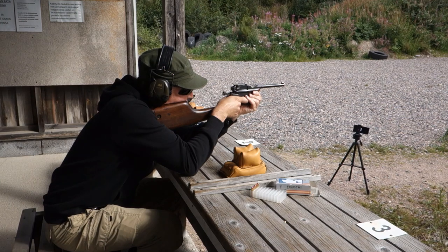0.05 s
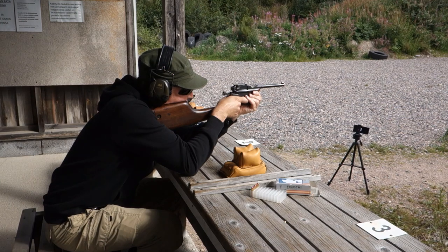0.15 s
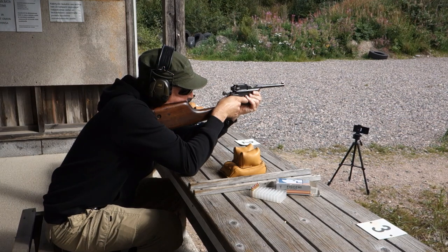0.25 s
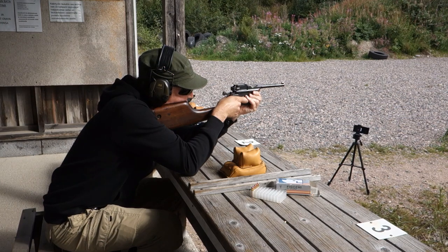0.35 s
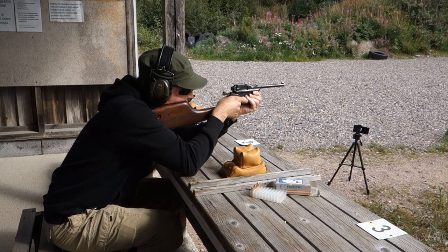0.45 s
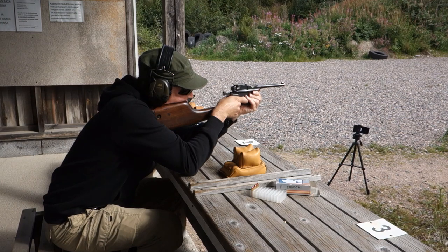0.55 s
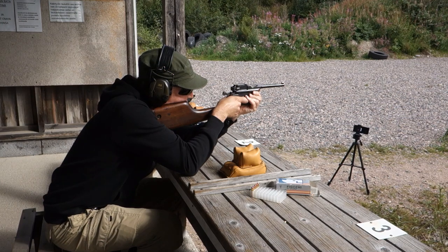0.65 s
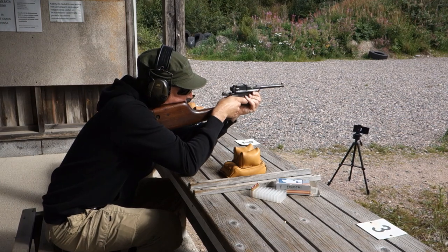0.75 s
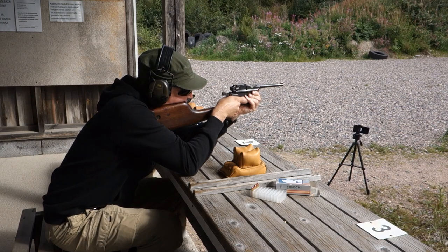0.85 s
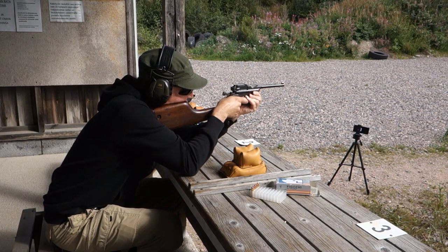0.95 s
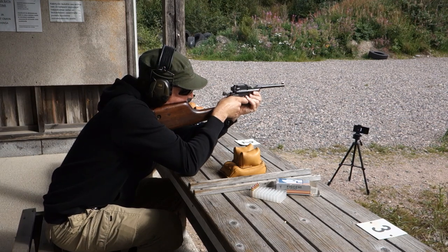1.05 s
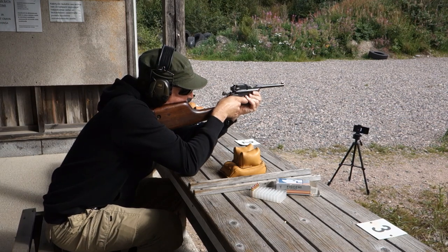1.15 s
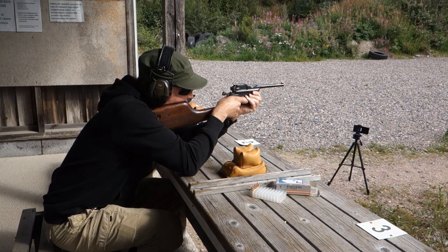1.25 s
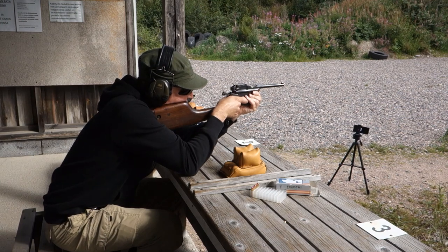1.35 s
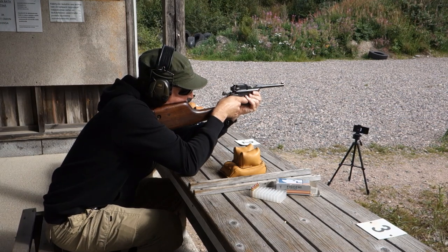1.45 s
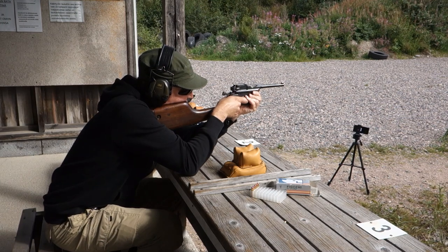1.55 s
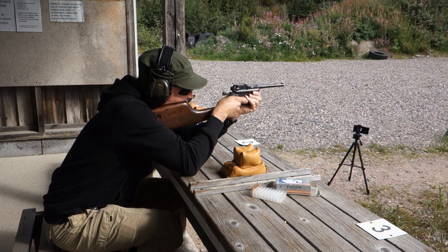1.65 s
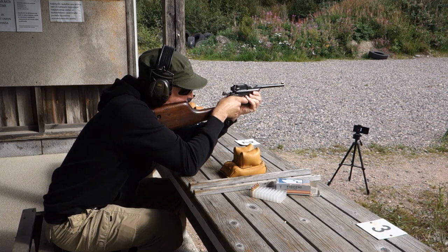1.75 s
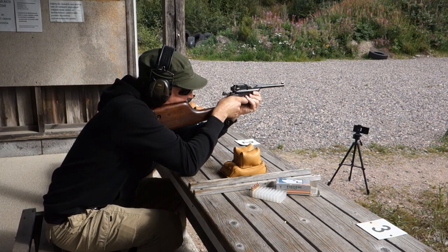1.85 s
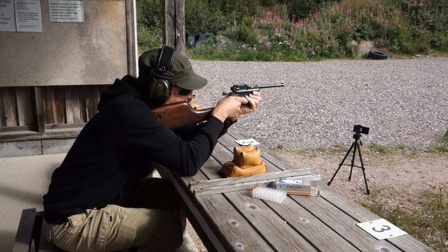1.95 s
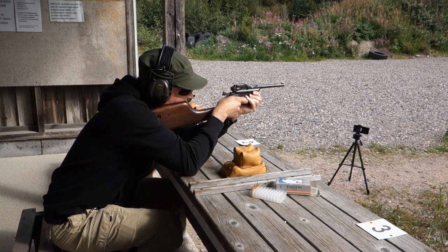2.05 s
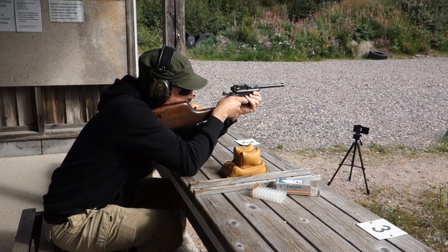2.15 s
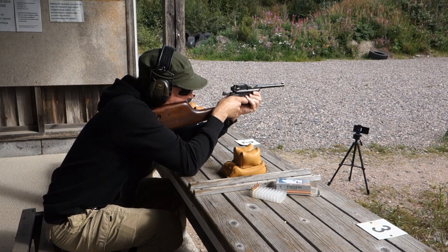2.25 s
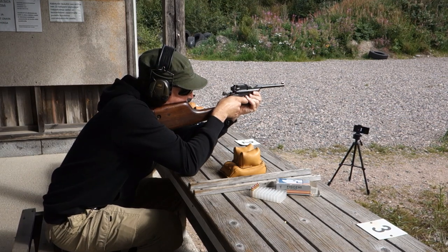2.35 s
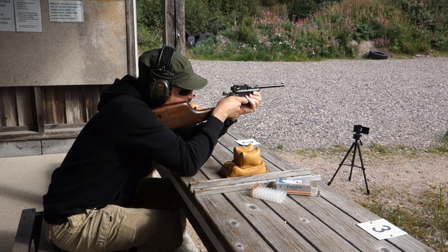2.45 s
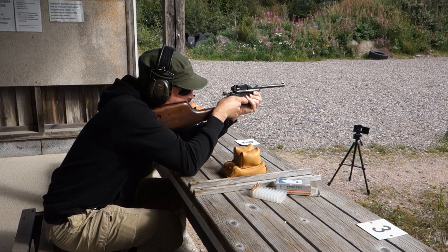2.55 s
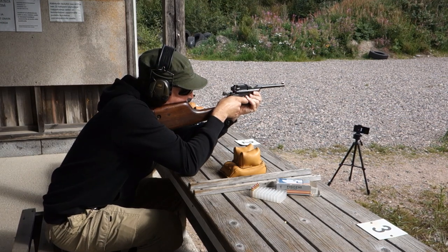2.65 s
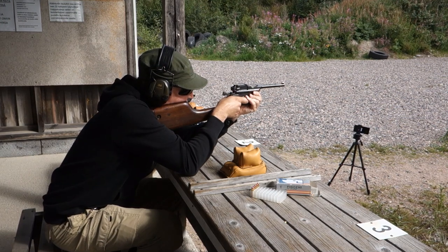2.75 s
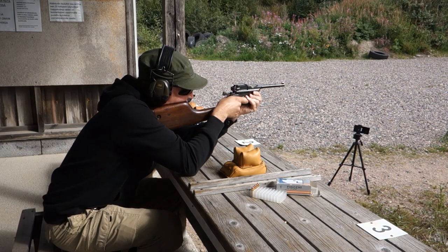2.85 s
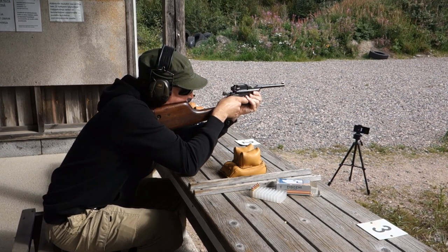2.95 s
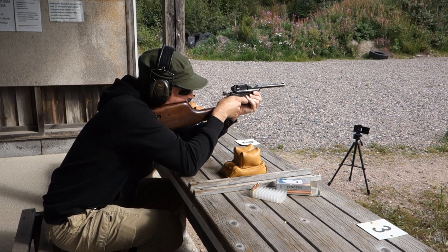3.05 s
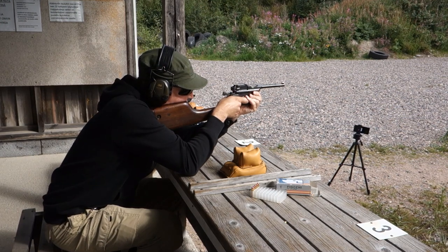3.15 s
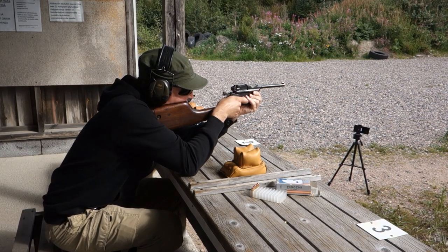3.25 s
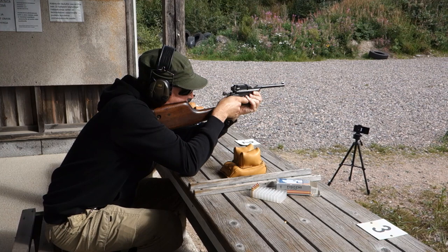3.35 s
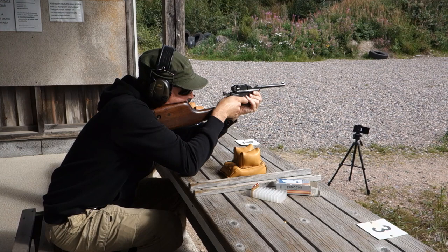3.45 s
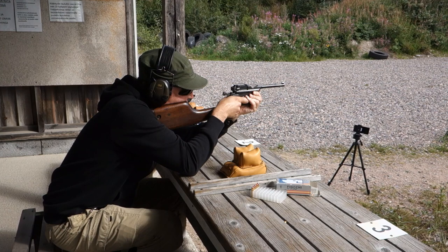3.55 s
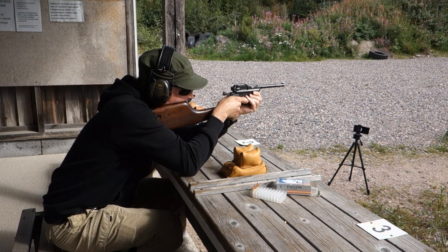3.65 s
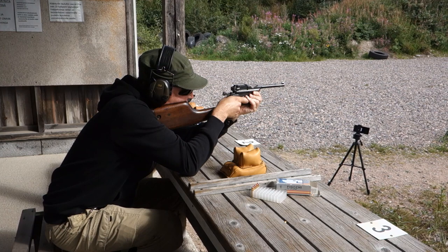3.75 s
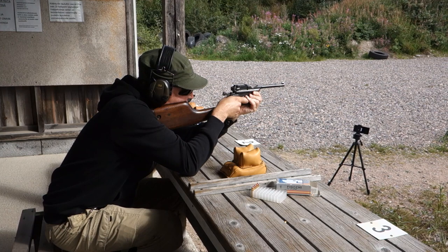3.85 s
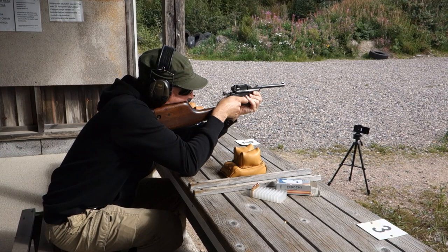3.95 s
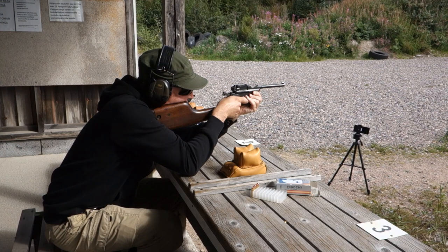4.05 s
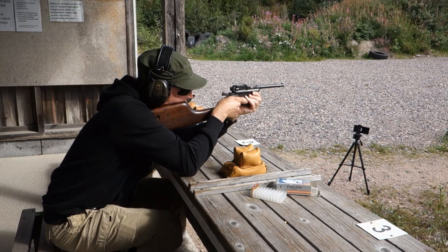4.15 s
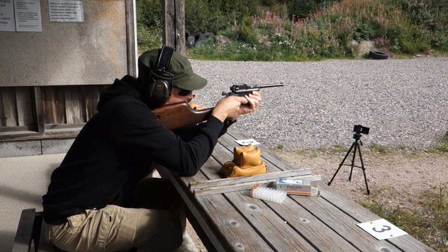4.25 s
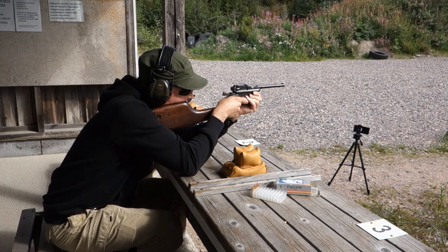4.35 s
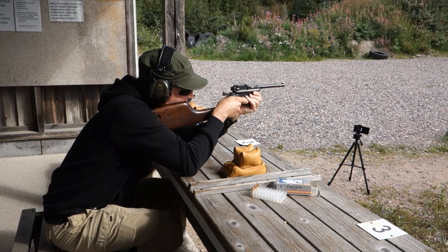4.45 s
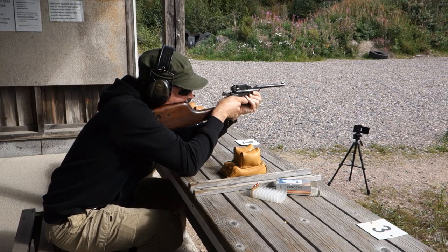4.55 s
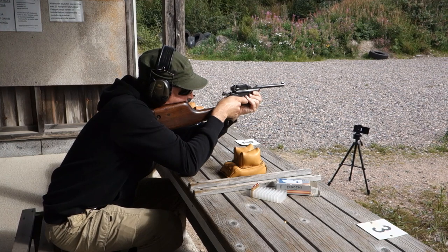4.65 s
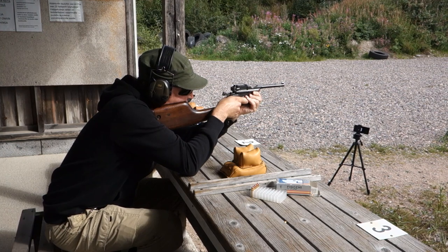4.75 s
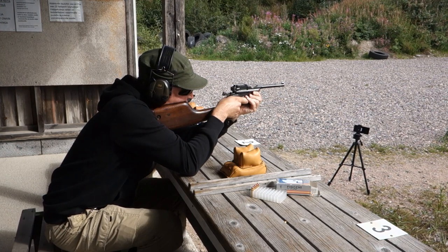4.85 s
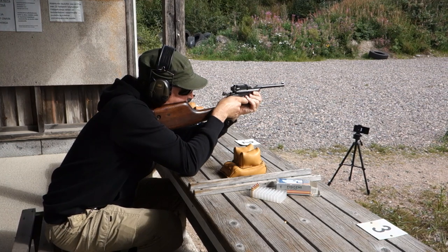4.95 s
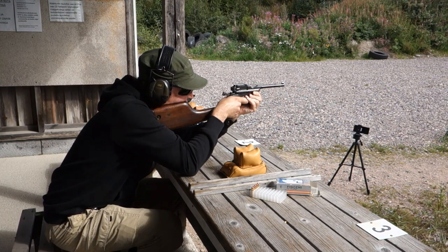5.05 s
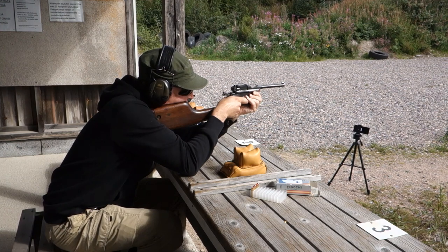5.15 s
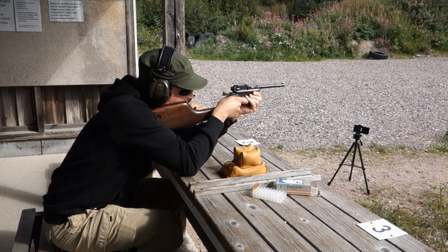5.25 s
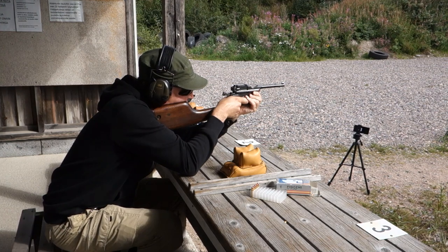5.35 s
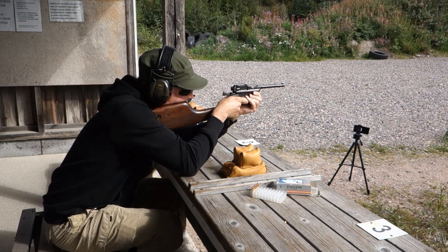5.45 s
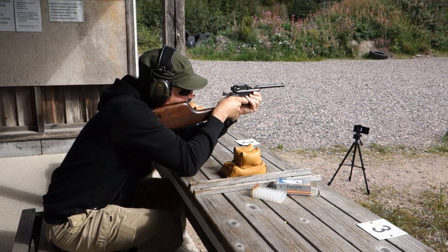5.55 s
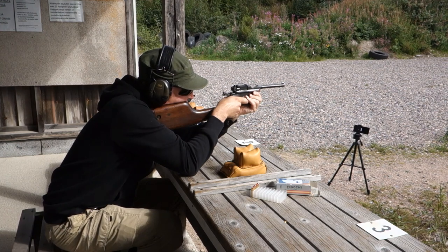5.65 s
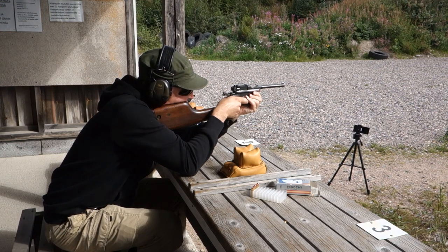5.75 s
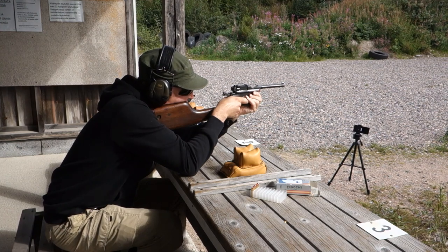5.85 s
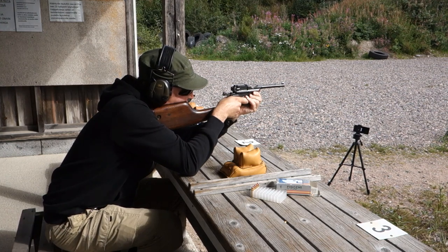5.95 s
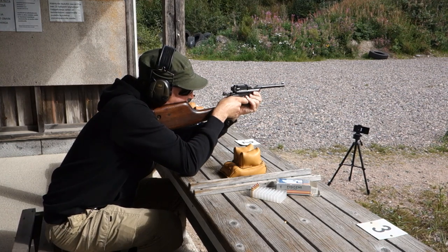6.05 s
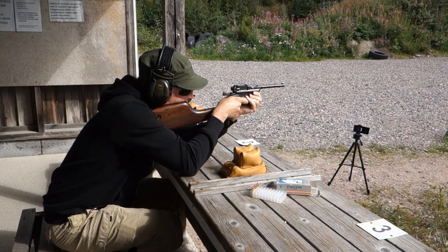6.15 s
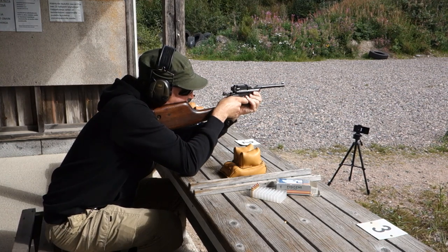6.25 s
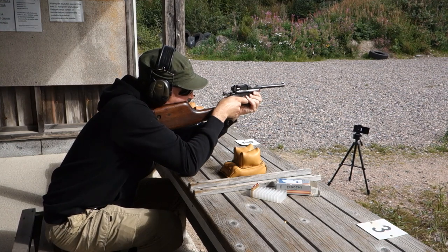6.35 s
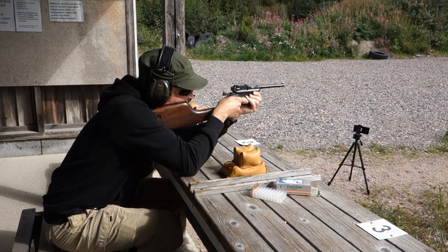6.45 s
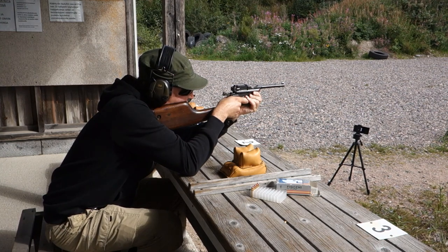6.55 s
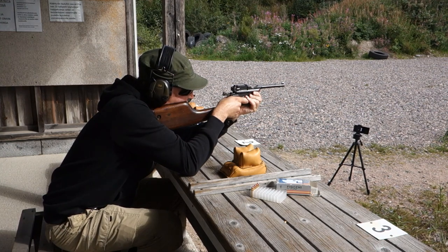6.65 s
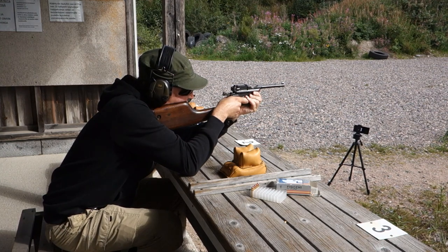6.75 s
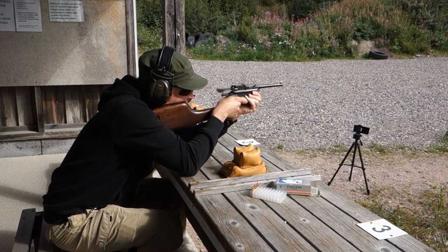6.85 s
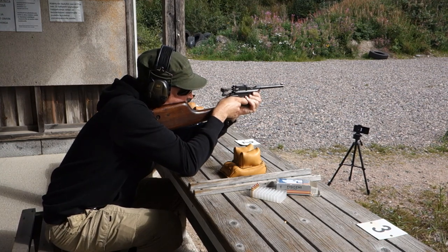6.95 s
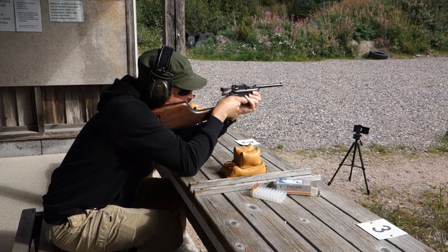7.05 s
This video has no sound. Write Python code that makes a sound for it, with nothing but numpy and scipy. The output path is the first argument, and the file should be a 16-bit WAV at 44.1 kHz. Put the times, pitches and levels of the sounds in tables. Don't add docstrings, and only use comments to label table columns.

```python
import sys
import numpy as np
from scipy import signal
from scipy.io import wavfile
from scipy.ndimage import uniform_filter1d

SR = 44100
rng = np.random.default_rng(int(sys.argv[2]) if len(sys.argv) > 2 else 0)


def waveform_to_disk(signal):
    frames = np.transpose(np.atleast_2d(signal))
    scaled = np.clip(frames, -1, 1) * 32767
    samples = np.round(scaled).astype(np.int16)
    wavfile.write(sys.argv[1], SR, samples)


def field_ratio(decibels):
    return 10 ** (np.asarray(decibels, dtype=float) / 20)


N = 312228

# t/s, blast level/dB, hammer level/dB
SHOTS = [
    (0.622, -16.5, -28.5),
    (4.0119, -15, -22.5),
    (6.7931, 5, -25),
]
# f/Hz, correlation
SHOT_LIKENESS = [(60, 1), (140, 1), (270, 0.98), (490, 1), (1410, 0.82), (4040, 0.39), (11600, -0.35)]


def in_time(rows):
    s, value = np.transpose(rows)
    return np.interp(np.arange(N) / SR, s, value)


def at_hz(points, hz):
    f, value = np.array(points).T
    return np.interp(np.log(hz), np.log(f), value)


def rms_one(x):
    return x / np.sqrt(np.mean(x ** 2) + 1e-20)


def band(x, low_hz, high_hz, order=2):
    sos = signal.butter(order, [low_hz, min(high_hz, .45 * SR)], "band", fs=SR, output="sos")
    return signal.sosfilt(sos, x)


def drift(rate):
    pole = np.exp(-2 * np.pi * rate / SR)
    wander = signal.lfilter([1], [1, -2 * pole, pole * pole], rng.standard_normal(N + SR))
    return rms_one(wander[SR:])


def lumps(rate, depth_db):
    return field_ratio(1.5 * depth_db * np.tanh(drift(rate) / 1.5))


def panned(x, pan_db):
    return np.array([x * field_ratio(pan_db / 2), x * field_ratio(-pan_db / 2)])


def ring(clicks, hz, t60):
    r = field_ratio(-60 / (t60 * SR))
    w = 2 * np.pi * hz / SR
    return signal.lfilter([0, np.sin(w)], [1, -2 * r * np.cos(w), r * r], clicks + 1e-18)


def struck(modes, size):
    blow = np.eye(1, size)[0]
    return sum(field_ratio(db) * ring(blow, hz, t60) for hz, db, t60 in modes)


def noise(size, spectrum, likeness, t60=((1, 1e6),)):
    edges = 25 * 2 ** np.arange(0, 9.1, .5)
    white = rng.standard_normal((2, 2, size))
    t = np.arange(size) / SR
    out, power = 0, 0
    for k, (low, high) in enumerate(zip(edges, edges[1:])):
        hz = np.sqrt(low * high)
        alike = np.clip(at_hz(likeness, hz), -1, 1)
        gain = field_ratio(at_hz(spectrum, hz))
        if gain > 1e-4:
            mid, side = band(white[k % 2], low, high)
            pair = np.sqrt(.5 + alike / 2) * mid + np.sqrt(.5 - alike / 2) * side * [[1], [-1]]
            out = out + gain * pair * field_ratio(-60 * t / at_hz(t60, hz))
            power += gain ** 2 * (high - low) * 2 / SR
    return out / np.sqrt(power)


def smeared(sound, t60, gap_s=1e-6):
    t = np.arange(len(sound)) / SR
    walls = rng.standard_normal((2, len(t))) + rng.standard_normal(len(t))
    walls = walls * field_ratio(-60 * t / t60) * (1 - np.exp(-(t / gap_s) ** 4))
    walls = rms_one(walls) / np.sqrt(len(t))
    return signal.fftconvolve(walls, sound[None])[:, :len(t)]


def add(track, s, sound):
    i = round(s * SR)
    track[:, i:i + sound.shape[1]] += sound[:, :N - i]


def ticks(table, modes, dull_db, grit_s, body_room_db):
    usual_peak_db, hard_is_bright = -32, 0.2
    out, click = np.zeros((2, N)), np.eye(1, SR // 3)[0]
    bright = 4.77 * band(click, 3830, 14000)
    dull = band(click, 2000, 5400)
    rung = struck(modes, len(click))
    for s, peak_db, mode_db, room_db, pan_db in table:
        grit = rng.standard_normal(400) * np.exp(-np.arange(400) / SR / grit_s)
        grit[0] += 4.5
        snap = bright + field_ratio(dull_db - hard_is_bright * (peak_db - usual_peak_db)) * dull
        snap = np.convolve(snap[:300], grit / np.linalg.norm(grit))
        snap = np.pad(snap, (0, len(click) - len(snap)))
        body = field_ratio(mode_db) * rung
        hiss = field_ratio(room_db + 17.5) * band(snap, 1500, 8100, order=1)
        room = smeared(hiss + field_ratio(body_room_db) * body, t60=0.24, gap_s=0.0035)
        add(out, s + 0.00019, field_ratio(peak_db + 0.5) * (panned(snap + body, pan_db) + room))
    return out


def air():
    # f/Hz, level/dB per Hz
    spectrum = [(120, -22.5), (200, -17.5), (344, -7), (623, -6), (1410, -13), (2220, -12), (2770, -15.5),
                (3450, -14.5), (5740, -19), (10600, -28.5), (11500, -68.5), (15000, -81), (22000, -120)]
    # f/Hz, correlation
    likeness = [(60, 0.94), (220, 1), (830, 0.39), (3100, 0.44), (11600, -0.38)]
    # t/s, level/dB
    level = [(0, -41), (.03, -79), (.07, -86), (.13, -61), (.24, -58), (.29, -51.5), (.37, -58), (.59, -59),
             (2.5, -62), (3.5, -58), (3.83, -55.5), (3.88, -54.5), (3.96, -53), (5.7, -60.5), (6.6, -56.5),
             (6.66, -51.5), (6.74, -50.5)]
    sway_db = .6 * drift(4)
    return field_ratio(in_time(level) + 2.0 + sway_db) * noise(N, spectrum, likeness)


def gusts():
    # t/s, level/dB
    breeze_level = [(0, -35.5), (1.1, -35.5), (2.1, -50), (2.8, -51), (3.4, -51), (3.75, -53.5), (3.9, -37),
                    (4.5, -52), (4.9, -56.5), (5.25, -53), (5.5, -62), (6.1, -45), (7.08, -41.5)]
    # start t/s, hold/s, rumble level/dB, edge level above it/dB
    gust_events = [(-.01, 0.073, -24.5, 7), (0.106, 0.022, -32, -13.5), (0.298, 0.012, -28, -17),
                   (0.342, 0.13, -28, -4), (0.537, 0.035, -24, -5), (1.224, 0.033, -28, -6),
                   (1.294, 0.086, -27, 1), (1.404, 0.134, -32.5, -7.5), (1.605, 0.1, -40, -32),
                   (1.742, 0.112, -30.5, -5.5), (1.879, 0.043, -29, -7.5), (2.02, 0.018, -26.5, -19),
                   (2.073, 0.24, -40.5, -37), (2.36, 0.059, -41.5, -34), (2.526, 0.0192, -36.5, -12.5),
                   (2.567, 0.084, -45, -49), (2.884, 0.078, -35, -16), (3.005, 0.12, -38, -25),
                   (3.087, 0.11, -42.5, -33), (3.228, 0.1, -50, -9), (3.421, 0.025, -39.5, -13),
                   (3.503, 0.068, -49, -12), (5.745, 0.11, -56, -18), (6.048, 0.017, -27.5, -18.5),
                   (6.084, 0.08, -37.5, -34.5), (6.227, 0.11, -28, -14.5), (6.442, 0.04, -24.5, -34),
                   (6.498, 0.11, -36.5, -45), (6.621, 0.017, -53, -19), (6.708, 0.034, -47, -3)]
    rise_s, fall_s, breeze_edge_db = 0.0089, 0.019, -21.5
    t = np.arange(N) / SR
    breeze = field_ratio(in_time(breeze_level)) * lumps(5.3, depth_db=3.0)
    rumble, edge = breeze, breeze * field_ratio(breeze_edge_db)
    for s, hold, level_db, edge_db in gust_events:
        shape = np.clip((t - s) / rise_s, 0, 1) * np.exp(-np.maximum(t - s - hold, 0) / fall_s * 2)
        rumble = rumble + field_ratio(level_db) * shape
        edge = edge + field_ratio(level_db + edge_db) * shape
    return rumble, edge


def wind():
    # f/Hz, level/dB per Hz
    rumble_spectrum = [(12, -48), (20, -10), (70, 1), (130, -1.5), (201, -5), (252, -10), (300, -14.5),
                       (400, -35.5), (520, -43.5), (880, -120)]
    # t/s, peak level/dB, f/Hz, snap level/dB
    puffs = [(0.012, -6.5, 179, -26), (0.033, -7.5, 217, 7.5), (0.05, -10, 183, -11), (0.068, -21, 245, 13),
             (.114, -22.5, 257, -15), (0.347, -18.5, 158, -14), (0.391, -15.5, 182, -24),
             (0.419, -12, 196, 5.5), (.466, -15.5, 181, -25), (0.542, -22, 151, 2), (0.555, -30, 363, 25),
             (1.245, -17, 293, -18), (1.327, -10.5, 150, -6), (1.347, -14, 226, 5.5), (1.747, -29, 151, -3),
             (1.786, -26, 232, -16), (1.83, -18.5, 216, -18), (1.849, -15.5, 177, -28),
             (1.89, -18, 118, -9), (2.032, -29, 152, -12), (6.057, -20.5, 330, -15), (6.26, -25, 301, -20),
             (6.32, -20, 160, -24), (6.44, -16, 178, -24), (6.46, -19.5, 209, -29), (6.47, -18, 191, -25),
             (6.512, -24.5, 153, -20), (6.649, -31, 150, -2),
             (0.435, -21, 177, -17), (1.229, -22, 142, -15), (1.314, -25, 197, -15),
               (1.383, -22, 167, -15), (1.399, -16.5, 139, -15), (1.432, -19, 262, -15),
               (1.47, -23, 221, -18), (1.496, -19, 117, -17), (1.52, -26, 219, -15), (1.547, -31, 212, -15),
               (1.705, -27.5, 169, -13), (1.916, -31, 160, -15), (2.177, -27.5, 163, -15),
               (2.198, -37, 194, -15), (2.262, -46, 138, -15), (2.312, -36, 140, -15),
               (2.37, -36, 123, -13), (2.406, -22.5, 124, -13), (2.542, -42, 192, -15),
               (2.594, -32, 129, -15), (2.623, -42, 164, -15), (2.647, -35, 220, -15),
               (2.807, -34.5, 130, -15), (2.898, -37, 122, -15), (2.921, -36, 187, -15),
               (2.937, -32, 261, -15), (2.955, -41, 165, -15), (3.027, -37, 144, -15),
               (3.057, -26, 132, -15), (3.074, -32, 146, -13), (3.088, -30, 146, -17),
               (3.111, -22.5, 154, -23), (3.323, -37, 174, -15), (3.434, -37, 123, -9),
               (3.522, -32, 110, -15), (3.574, -45, 193, -15), (3.895, -34, 200, -15),
               (3.942, -36, 146, -12), (5.762, -42, 70, -15), (5.777, -31, 102, -18), (5.8, -42, 129, -15),
               (5.816, -43, 176, -15), (5.856, -41, 97, -15), (6.111, -28, 177, -11),
               (6.276, -22.5, 250, -21), (6.31, -21, 218, -16), (6.554, -32, 144, -15),
               (6.58, -24.5, 151, -10)]
    wander_db = 1.5
    strength, sharpness = gusts()
    rumble = noise(N, rumble_spectrum, [(100, 0.85), (350, 0.32)]) * lumps(24.0, depth_db=5.0)
    edge = band(rng.standard_normal((2, N)) + rng.standard_normal(N), 220, 526, order=3)
    edge *= lumps(36.0, depth_db=3.5)
    spit = band(rng.standard_normal((2, N)), 500, 1400, order=4) * lumps(50.0, depth_db=9.5)
    edge += strength * spit
    out = strength * rms_one(rumble) + sharpness * rms_one(edge)
    out = field_ratio(-2.5) * out * panned(0.79, wander_db * drift(4.3))
    for s, peak_db, hz, snap_db in puffs:
        turns = np.arange(int(4 * SR / hz)) * hz / SR
        puff = np.sin(2 * np.pi * turns) * turns ** 2 * np.exp(-3.4 * turns)
        flap = np.sin(2 * np.pi * 1.55 * turns) * turns ** 2 * np.exp(-4.5 * turns)
        puff += field_ratio(snap_db - 5.0) * flap
        add(out, s - .5 / hz, panned(field_ratio(peak_db + 23.5) * puff, wander_db * rng.standard_normal()))
    return band(out, 92, 4000, order=1)


def case_ring(strikes, hz, tumble_db, rise_s):
    nulls = [1.47, 1.487, 1.51, 1.532, 1.586, 1.632, 1.918, 1.99, 2.135, 2.166, 2.222, 2.322, 5.256, 5.287,
             5.355]
    null_width_s, null_depth = 0.0033, 0.62
    t, power = np.arange(N) / SR, np.zeros((2, N))
    for s, level_db, t60, pan_db in strikes:
        age = t[:SR] + max(-s, 0)
        swell = field_ratio(level_db - 60.0 * age / t60) * (1 - np.exp(-age / rise_s))
        add(power, max(s, 0), panned(swell, pan_db) ** 2)
    coarse = t[::32]
    nearest_s = np.min(np.abs(coarse[:, None] - np.array(nulls)), axis=1)
    spin = 1 - null_depth * np.exp(-(nearest_s / null_width_s) ** 2)
    tone = np.sqrt(2) * np.sin(2 * np.pi * hz * t + 0.39 * drift(25)) * np.interp(t, coarse, spin)
    return np.sqrt(power) * tone * lumps(43.0, tumble_db) * panned(0.5, 10.5 * np.tanh(drift(30)))


def case_rings():
    # t/s, level/dB, t60/s, left-right/dB
    first = [(-.01, -68, 0.63, -5), (1.455, -29, 0.39, 11), (1.884, -42, 0.27, 18), (2.086, -31.5, 0.3, 9),
             (2.165, -40, 0.57, 15), (2.192, -40, 0.15, 14), (2.25, -26, 0.15, 9), (2.327, -34, 0.071, 10)]
    # t/s, level/dB, t60/s, left-right/dB
    second = [(5.2335, -27.5, 0.14, 2.2), (5.26, -47, 0.34, 0.69)]
    out = case_ring(first, 9710, tumble_db=4.0, rise_s=0.011)
    return out + case_ring(second, 10140, tumble_db=5.0, rise_s=0.0045)


def small_clicks():
    # t/s, peak level/dB, mode level/dB, room level/dB, left-right/dB
    contacts = [(0.07, -44, -30, -24, 0), (0.0775, -40.5, -38, -28, -1.0), (3.5164, -36, -25, -18, -1.0),
                (3.523, -41, -25, -17, 0), (3.5334, -18.5, -7.5, -17, -1.0), (3.5395, -26, -30, -31, 0.0),
                (3.549, -40, -25, -20, 0)]
    # f/Hz, level/dB, t60/s
    modes = [(4950, -5, .005)]
    return ticks(contacts, modes, dull_db=4.0, grit_s=0.0017, body_room_db=-3.0)


def rustles():
    # t/s, level/dB, length/s, f/Hz
    creaks = [(.13, -62, .33, 1150), (.13, -66, .2, 2080), (2.82, -56, .09, 560), (3.7, -55, .13, 600),
              (3.72, -57, .11, 800), (3.72, -62, .1, 1160)]
    out = np.zeros((2, N))
    for s, level_db, length, hz in creaks:
        hiss = band(rng.standard_normal(SR // 2), hz * .96, hz * 1.04)[:int(length * SR)]
        add(out, s, panned(field_ratio(level_db) * rms_one(hiss) * np.hanning(len(hiss)) ** .5, 0))
    return out


def hammer(out, s, hammer_db):
    lead_s, rebound_s, rebound_db, clack_t60_s = 0.0108, 0.007, -2.5, 0.061
    spectrum = [(900, -2), (2000, -12.5), (5000, -6.5), (10000, -8.5)]   # f/Hz, level/dB per Hz
    for late_s, loss_db in ((0, 0), (rebound_s, rebound_db)):
        clack = noise(900, spectrum, SHOT_LIKENESS, [(1, clack_t60_s)])
        add(out, s - lead_s + late_s, field_ratio(hammer_db + loss_db + 6.5) * clack)


def roar():
    # f/Hz, level/dB per Hz
    blast = [(29, -39.5), (50, -31.5), (252, -5), (767, -3), (1010, -6), (1290, -6), (1630, -11.5),
             (3220, -19.5), (10500, -8), (11500, -24.5), (15000, -66), (22000, -120)]
    # f/Hz, t60/s
    blast_t60 = [(100, 0.94), (300, 0.64), (700, 0.84), (1500, 0.81), (3000, 0.93), (6000, 0.62),
                 (11000, 0.14)]
    # f/Hz, level/dB per Hz
    crack_spectrum = [(300, -21.5), (1000, 2), (3000, 5), (7000, -11), (11000, -6)]
    # delay t/s, level/dB, rise/s, top f/Hz
    echoes = [(.0, 11, 0.0012, 8880), (.113, 0.5, 0.0019, 2590), (.17, -10, 0.006, 980),
              (.19, -8, 0.022, 8800), (.28, -14.5, 0.014, 1720)]
    # delay t/s, level/dB, length/s, f/Hz
    surges = [(0.017, -1.5, 0.07, 570), (.11, -4, 0.15, 557), (0.129, -3.5, 0.062, 665),
              (.225, -11, 0.11, 800), (0.47, -33, 0.06, 3800), (.3, -18, 0.021, 940),
              (0.191, -23.5, 0.17, 4500)]
    # f/Hz, share added
    roar_tone = [(310, .35), (430, -.35), (630, .45), (1050, -.2)]
    body = noise(SR, blast, SHOT_LIKENESS, blast_t60)
    out, t = np.zeros((2, SR * 2)), np.arange(SR) / SR
    short = SR // 3
    crack = noise(short, crack_spectrum, SHOT_LIKENESS, [(1000, 0.86), (10000, 0.42)])
    out[:, :short] += field_ratio(10) * crack * (1 - np.exp(-t[:short] / 0.003))
    for delay, echo_db, rise, top_hz in echoes:
        i = round(delay * SR)
        echo = band(body, 160000.0 / top_hz, top_hz, order=1)
        out[:, i:i + SR] += field_ratio(echo_db) * echo * (1 - np.exp(-t / rise)) * np.clip(4 - 4 * t, 0, 1)
    for delay, surge_db, length, hz in surges:
        i, swell = round(delay * SR), np.hanning(int(length * SR))
        strip = band(body[:, :len(swell) + 999], hz * 0.77, hz * 1.14)[:, 999:]
        out[:, i:i + len(swell)] += field_ratio(surge_db) * swell * rms_one(strip)
    out = out + sum(share * band(out, hz / 1.13, hz * 1.13, order=1) for hz, share in roar_tone)
    scatter_db = .5 * drift(22) + 1.2 * drift(150)
    return out * field_ratio(scatter_db[:out.shape[1]])


def valley():
    # f/Hz, level/dB per Hz
    spectrum = [(59, -49.5), (100, -39.5), (125, -32), (212, -24.5), (443, -10), (486, -8.5), (534, -10.5),
                (709, -6.5), (3260, -9.5), (9000, -55.5), (11700, -78), (19800, -120)]
    # f/Hz, t60/s
    decay = [(150, 7.4), (500, 6.26), (1000, 4.46), (2000, 2.79), (4000, 2.34), (9000, 1.0)]
    # f/Hz, level/dB, t60/s
    tail_modes = [(252.6, -5, 0.5), (288, -12, 0.46), (333, -11.5, .3), (615, -6, 0.26), (675, -9, 0.44),
                  (1250, -16.5, .6), (490, -20, 0.34), (496, -16.5, 0.71), (552, -15, 1.6), (693.6, -14, 1.1),
                  (813, -15.5, 0.9)]
    # f/Hz, level/dB, t60/s
    hums = [(483, -32, 3.5), (722, -37, 3.5)]
    hill_s, hill_db = 0.79, -20.5
    ridge_s, ridge_spread_s, ridge_db = 1.67, 0.22, -7.5
    size = SR * 3
    t = np.arange(size) / SR
    far = field_ratio(-23) * noise(size, spectrum, SHOT_LIKENESS, decay)
    far += smeared(struck(tail_modes, size), t60=0.64)
    shake, waver = rng.standard_normal(size), lumps(8, 3)[:size]
    for hz, hum_db, t60 in hums:
        far += field_ratio(hum_db - 60 * t / t60) * rms_one(band(shake, hz * .985, hz * 1.015)) * waver
    late = round(hill_s * SR)
    far[:, late:] += field_ratio(hill_db) * band(far, 270, 1760)[:, :-late] * np.hanning(size - late)
    far += field_ratio(ridge_db) * band(far, 460, 1100) * np.exp(-((t - ridge_s) / ridge_spread_s) ** 2)
    return far


def lows_late(x):
    age = np.arange(x.shape[1]) / SR
    return x - band(x, 60, 1200, order=1) * np.exp(-(age / 0.005) ** 2)


def shots():
    # t/s, level/dB, t60/s
    sear = (3.9945, -27, .03)
    overload_db, same_share = 9.5, 0.97
    out, same, far = np.zeros((2, N)), roar(), valley()
    for s, blast_db, hammer_db in SHOTS:
        answer = np.sqrt(same_share) * same + np.sqrt(1 - same_share) * roar()
        add(out, s, field_ratio(blast_db + overload_db) * lows_late(answer))
        add(out, s, field_ratio(blast_db + overload_db) * lows_late(far))
        hammer(out, s, hammer_db)
    sear_s, sear_db, sear_t60 = sear
    sear_spectrum = [(300, -1.5), (900, 0.5), (2500, -4), (6000, -17.5)]   # f/Hz, level/dB per Hz
    add(out, sear_s, field_ratio(sear_db) * noise(900, sear_spectrum, SHOT_LIKENESS, [(1, sear_t60)]))
    treble = band(out, 2000, 17000, order=1)
    return out * field_ratio([[1.1], [-1.1]]) + treble * [[-.2], [.2]]


def tinkles():
    # t/s, peak level/dB, mode level/dB, room level/dB, left-right/dB
    touches = [(0.999, -33, 0, -25, 0.0016), (1.024, -40, -1, -25, 0), (1.133, -49, -6, -28, 0),
               (1.157, -54, 5, -33, 0)]
    # f/Hz, level/dB, t60/s
    modes = [(5730, 8, 0.01), (6800, 7, 0.01), (6200, -4, .008)]
    return ticks(touches, modes, dull_db=-20, grit_s=.002, body_room_db=-2)


def knock():
    # t/s, peak level/dB, left-right/dB
    touches = [
        (1.4339, -10, 3),
        (1.443, -21, 7),
        (1.45, -9, 1),
        (1.46, -27, -7),
        (1.499, -34, 5),
    ]
    # f/Hz, level/dB, t60/s
    board = [(1160, -3.5, 0.22), (1220, -10.5, 0.075), (1430, -40, 0.033), (1640, -30, 0.022),
             (1870, -36, .02), (2217, -1.5, 0.043), (2430, -4, 0.034), (2620, -13, 0.023), (3250, -13, .02),
             (3600, -8, 0.016), (3700, -13, 0.017), (4630, -30, 0.011), (4800, -16, .015), (6000, -32, .01)]
    # f/Hz, level/dB per Hz
    room_spectrum = [(470, -57), (800, -9), (931, -44), (1150, -11), (1260, -5), (2410, -16), (2640, -13),
                     (4900, -30.5), (9000, -45), (11700, -65), (19800, -120)]
    out = np.zeros((2, N))
    for s, peak_db, pan_db in touches:
        blow = struck([(hz, db + 5.8 * rng.standard_normal(), t60) for hz, db, t60 in board], SR // 2)
        modes = field_ratio(-12.0) * np.convolve(blow, np.hanning(9) / 4)[:len(blow)]
        add(out, s, field_ratio(peak_db) * (field_ratio(2.5) * panned(modes, pan_db) + field_ratio(4.5) * smeared(modes, t60=0.37)))
    room = noise(SR // 2, room_spectrum, SHOT_LIKENESS, [(1000, 0.3), (3000, 0.33), (9000, 0.33)])
    build_up = 1 - np.exp(-np.arange(SR // 2) / SR / 0.0023)
    add(out, touches[0][0], field_ratio(-18.0) * band(room, 1120, 14000) * build_up)
    return out


def case_bounces():
    # t/s, peak level/dB, mode level/dB, room level/dB, left-right/dB
    bounces = [(1.8879, -21, -16.5, -12, -4), (1.8958, -30, -26, -22, 10), (1.9121, -26.5, -34, -30, 0),
               (1.928, -36, -8, -25, 0), (2.0194, -48, -10, -8, 3), (2.0768, -30, -25, -13, -8),
               (2.0802, -34, -31, -16, 14), (2.0885, -36, -36, -17, 0), (2.103, -42, -35, -15, 0),
               (2.122, -48, -41, -18, 2), (2.1921, -35.5, -20, -10, 4), (2.2, -39, -28, -17, 0),
               (2.2164, -42.5, -30, -17, -4.5), (2.2558, -48.5, -13, -3, 5), (1.456, -34, -38, -20, 0),
               (1.464, -27, -38, -19, 0)]
    # f/Hz, level/dB, t60/s
    modes = [(3560, -10, .03), (3770, -5, 0.036), (3804, -2.5, 0.052), (3870, 2.5, 0.044), (4200, -5, .035),
             (4260, -10, .025)]
    dented = [(hz * 0.99, db, t60 * 0.78) for hz, db, t60 in modes]
    out = ticks(bounces[:5], modes, dull_db=-17, grit_s=0.00027, body_room_db=6.5)
    return out + ticks(bounces[5:], dented, dull_db=-6, grit_s=0.00018, body_room_db=6)


def far_taps():
    # t/s, peak level/dB, mode level/dB, room level/dB, left-right/dB
    taps = [(5.2264, -41, -10, 2, -2.0), (5.234, -31.5, -14, -12, -0.5), (5.24, -40.5, -22, -13.5, 0),
            (5.265, -45, -17, -10, 0)]
    # f/Hz, level/dB, t60/s
    modes = [(4970, 3, 0.034), (3570, -15, .01), (6200, -4, .015), (7430, -11, .02)]
    return ticks(taps, modes, dull_db=0, grit_s=0.0038, body_room_db=-3)


def background_gain():
    duck_db, recover_s = -19, 1
    t = np.arange(N) / SR
    return field_ratio(sum(duck_db * (t > s) * np.exp(-(np.abs(t - s) / recover_s) ** 4.9) for s, *_ in SHOTS))


def scene():
    brass = case_rings() + tinkles() + knock() + case_bounces() + far_taps()
    return background_gain() * air() + wind() + small_clicks() + rustles() + shots() + brass


def roll_off(x):
    return signal.sosfilt(signal.butter(12, 12170, fs=SR, output="sos"), x)


def record(dry, ceiling_db=-9.5, release_db_s=120, settle_db=3):
    # t/s, fade-out/s, fade-in/s
    cuts = [
        (0.096, 0.018, 0.0078),
        (3.863, 0.049, 0.024),
        (6.629, 0.048, 0.033),
    ]
    settle_s, top = .07, .9
    t = np.arange(N) / SR
    power = uniform_filter1d(np.mean(dry ** 2, axis=0), size=300, origin=40)
    level_db = 10 * np.log10(np.abs(power) + 1e-12)
    held_db = np.maximum.accumulate(level_db + release_db_s * t) - release_db_s * t
    cut_db = np.maximum(held_db - ceiling_db, 0)
    busy = np.interp(t - settle_s, t, uniform_filter1d(np.clip(cut_db / 3, 0, 1), size=1500))
    x = top * np.tanh(dry * field_ratio(-cut_db - settle_db * busy) / top)
    for s, fade_out, fade_in in cuts:
        x = x * np.clip(np.maximum((s - t) / fade_out, (t - s) / fade_in), 0, 1) ** 1.63
    x = signal.sosfilt(signal.ellip(9, .5, 60, 11030, fs=SR, output="sos"), x)
    return roll_off(x)


dry = scene()
out = record(dry)
waveform_to_disk(out)
```